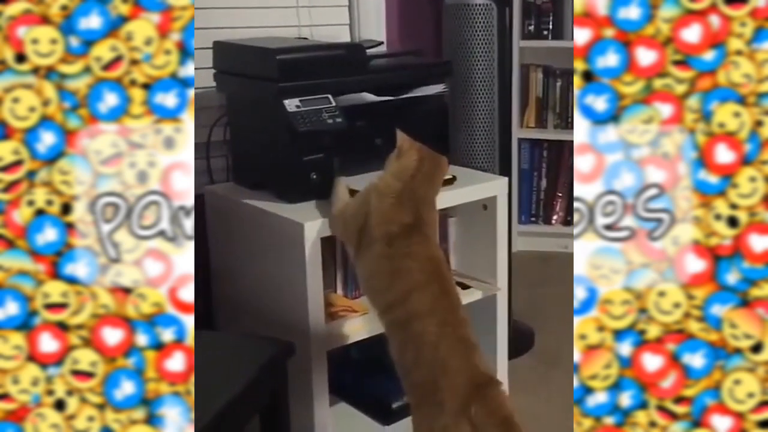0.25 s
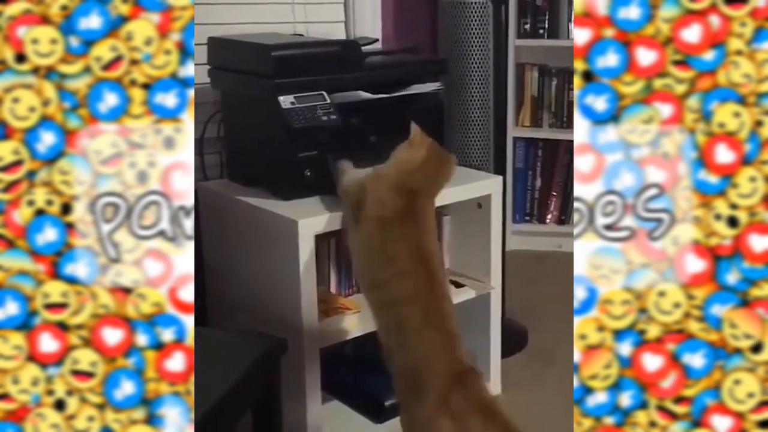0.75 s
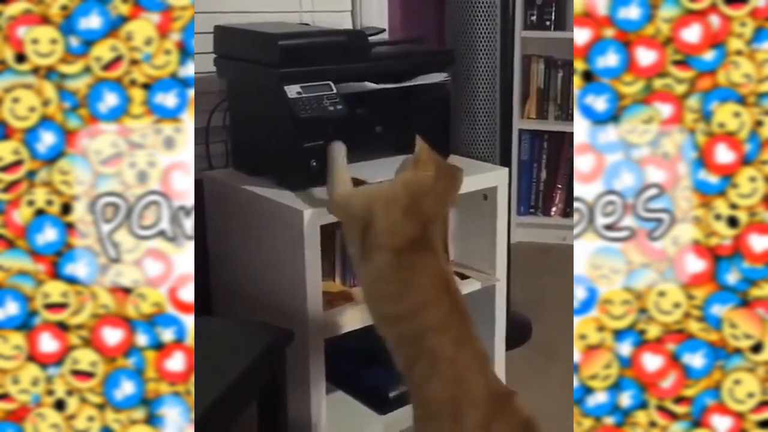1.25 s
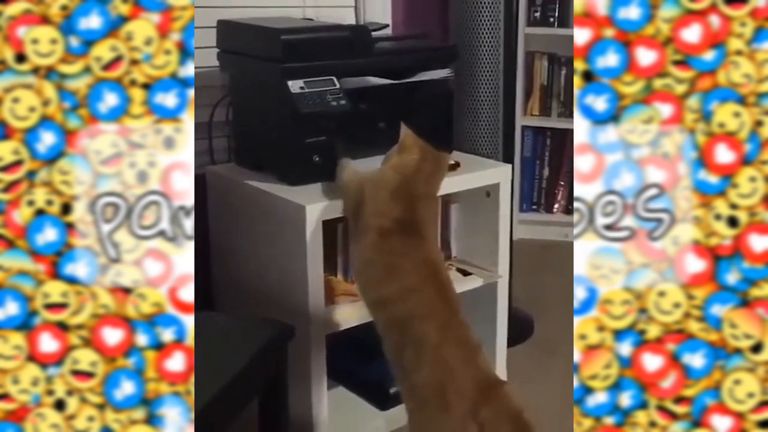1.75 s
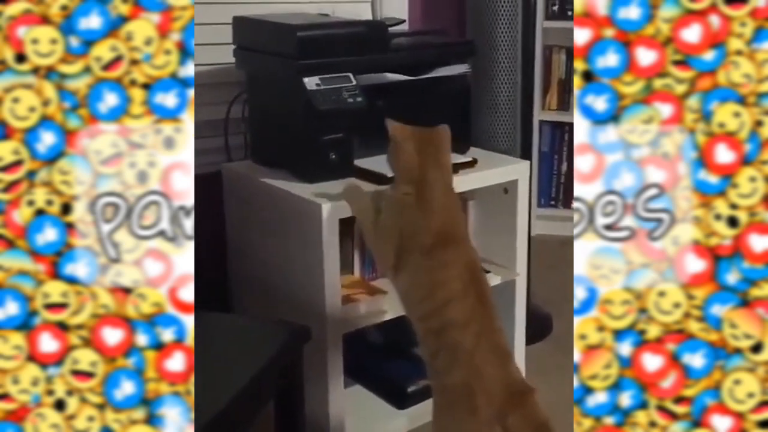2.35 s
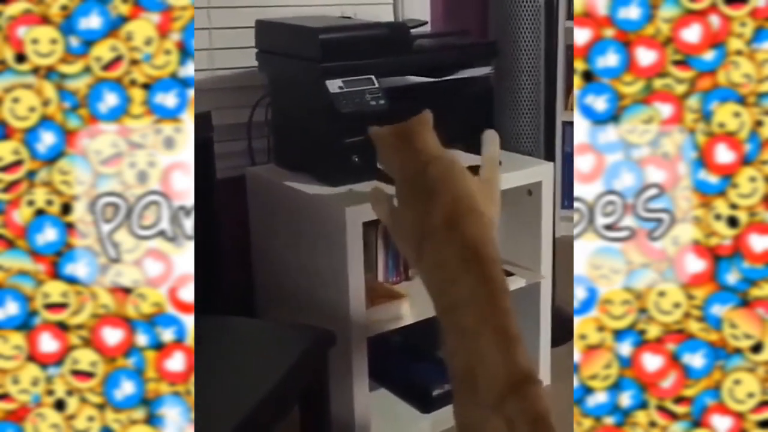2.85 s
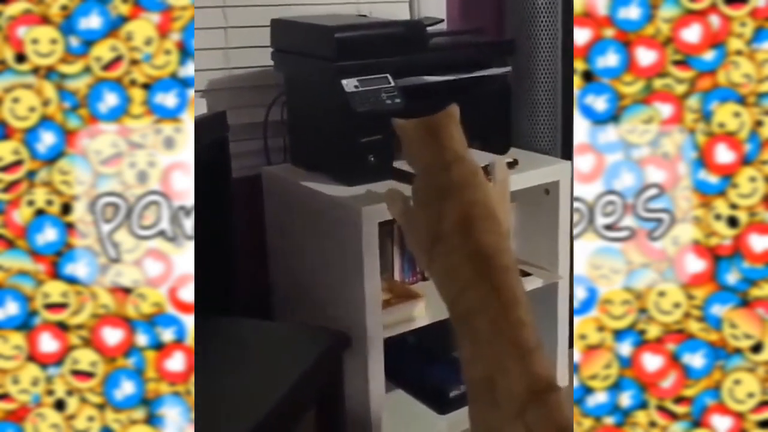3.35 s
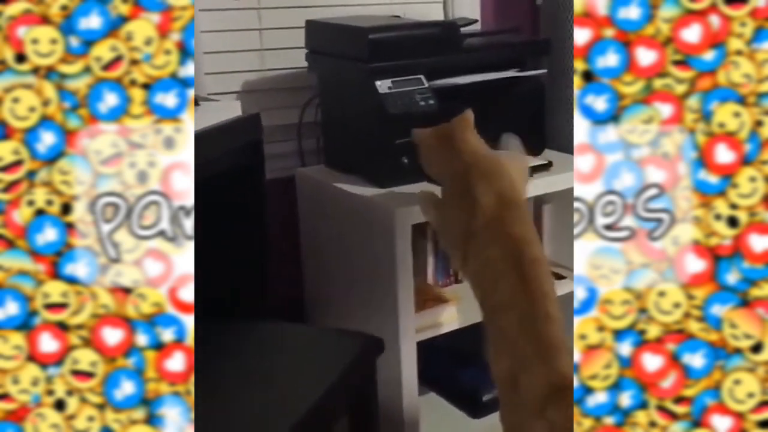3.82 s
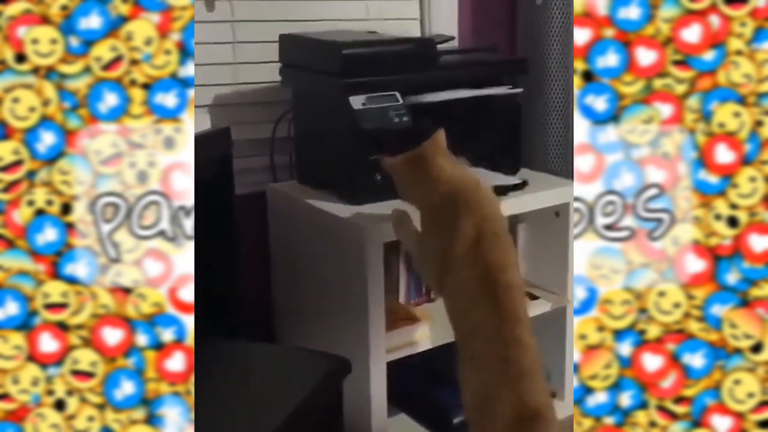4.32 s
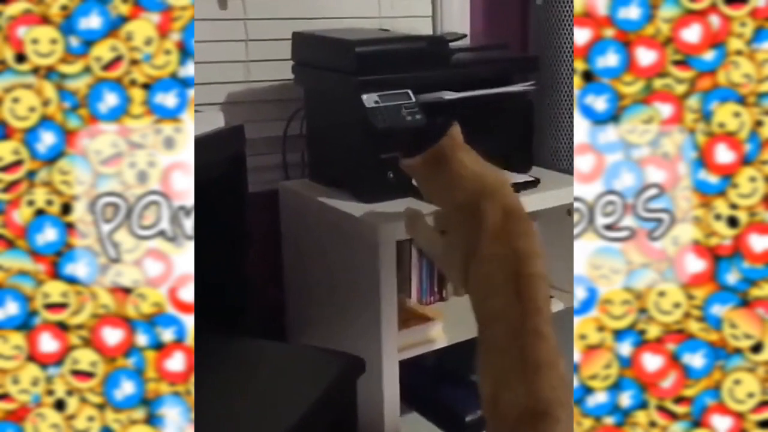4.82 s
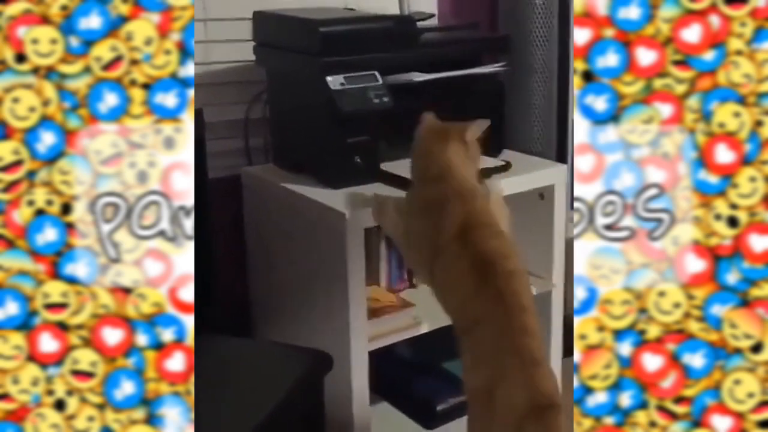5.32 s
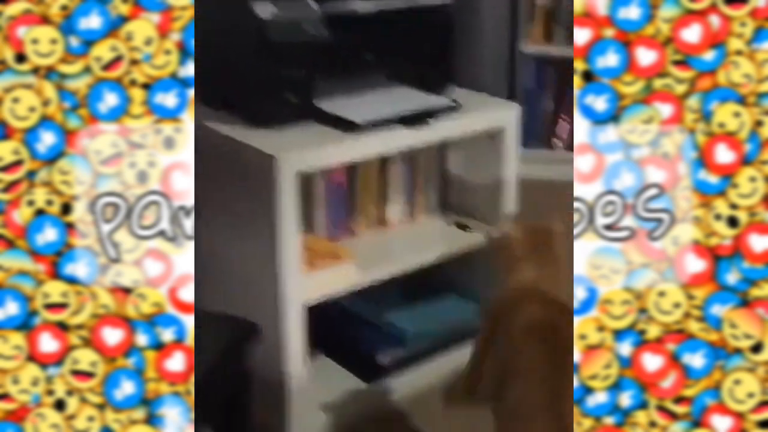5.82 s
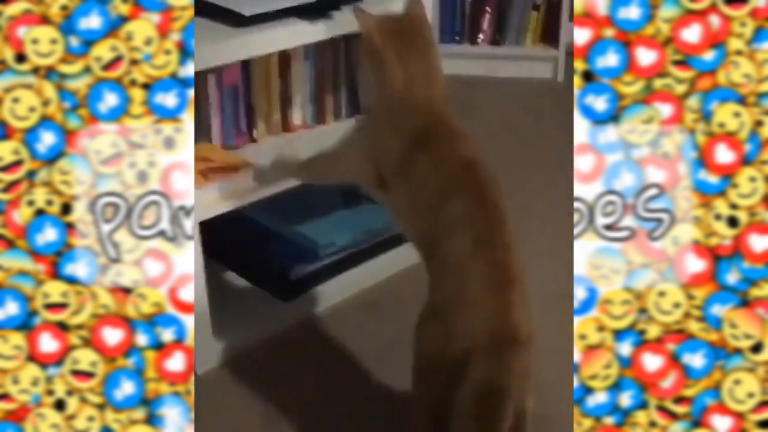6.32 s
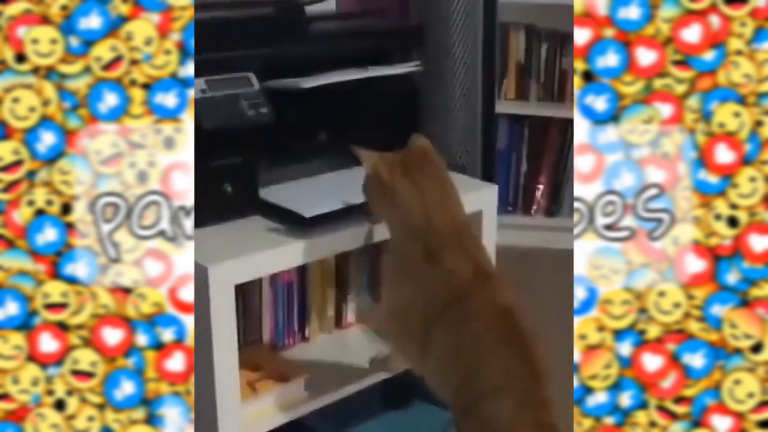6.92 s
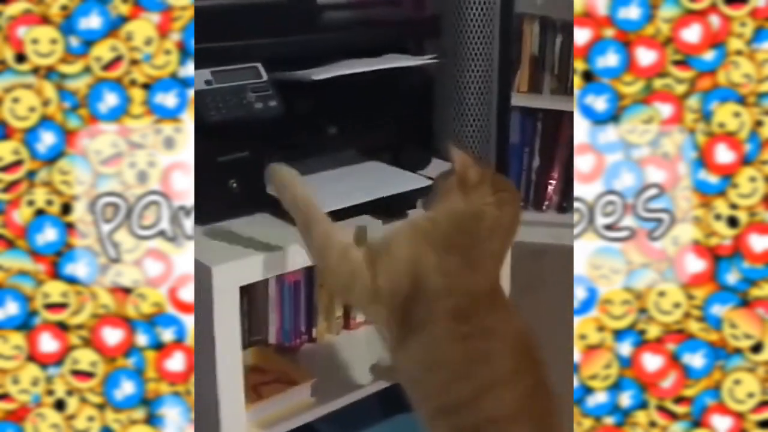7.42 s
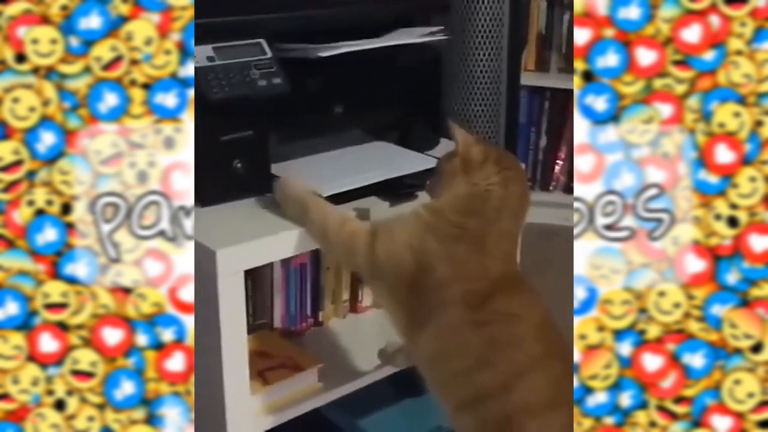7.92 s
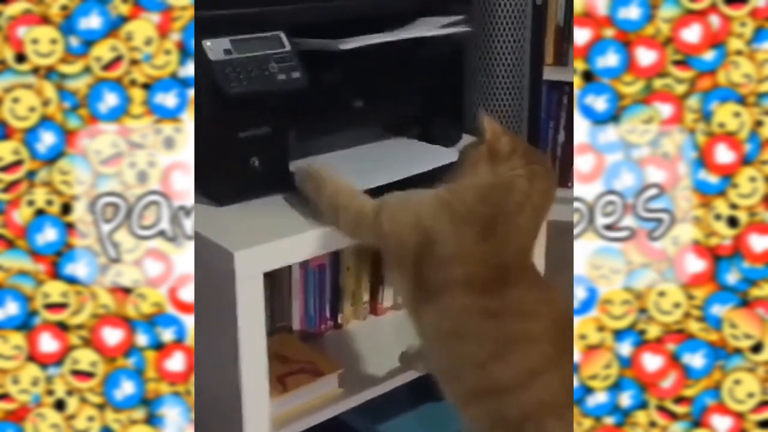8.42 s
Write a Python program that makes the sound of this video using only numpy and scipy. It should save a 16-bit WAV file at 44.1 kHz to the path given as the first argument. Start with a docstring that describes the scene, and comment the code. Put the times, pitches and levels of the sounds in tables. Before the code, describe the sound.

A soft fan hum with a faint whirr runs throughout in a small, quiet room, heard from a few steps away. A cat bats at a printer's loose plastic paper tray, each swat a quick clack and chatter that rings briefly. Two light clacks open, followed by paw scuffs and tiny claw pings, then harder swats with dull shelf thuds from about 0.9 to 1.6 seconds. Only sparse, faint taps come between 2 and 3.7 seconds. Scuffs lead into a second run of five sharp clacks from 4 to 5.1 seconds, the first ones with low thumps. Around 6 seconds the cat drops down and climbs back with faint thuds, then pats and scrapes on paper from 6.5 to 7.3 seconds. Three closer, brighter clacks land between 7.3 and 7.8 seconds, and two more near 8.5 seconds.

```python
"""Small, quiet room: a cat stands against a shelf and bats at an idling printer's plastic paper tray.
Each swat makes the loose tray clack and chatter; between swats the paws scuff and tap on paper and shelf.
Claws ping on the tray and the cat's weight thuds on shelf and floor.
The room rings briefly after every blow, over the soft hum of a fan."""
import sys
import numpy as np
from scipy import signal
from scipy.fft import rfft, irfft
from scipy.io import wavfile
from scipy.ndimage import uniform_filter1d

SR = 44100
rng = np.random.default_rng(int(sys.argv[2]) if len(sys.argv) > 2 else 0)


def store_wav(level_fs):
    """Save 16-bit WAV to argv[1]."""
    pcm = np.round(np.clip(np.atleast_2d(level_fs), -1, 1) * 32767)
    wavfile.write(sys.argv[1], SR, pcm.T.astype(np.int16))


N = 381899
SIZE = 32768  # samples per blow
T = np.arange(SIZE) / SR
HZ = np.fft.rfftfreq(SIZE, 1 / SR)

# spectrum of pad on paper: f/Hz, level/dB
PAD_ON_PAPER = [(25, -26), (70, -20.5), (120, -9.5), (240, 1), (420, -6.5), (650, 15), (1400, 9.5),
                (2400, -2.5), (4000, -10), (7000, -19), (10400, -23.5), (13000, -25.5)]


def undb(db):
    """Decibels to gain."""
    return 10 ** (np.asarray(db) / 20)


def curve(points, hz):
    """Join (f/Hz, level/dB) points on a log-frequency axis."""
    f, db = np.transpose(points)
    return np.interp(np.log(hz + 1), np.log(f), db)


def bumps(count, size):
    """Smooth random ripple, about size steps wide, unit spread."""
    x = uniform_filter1d(uniform_filter1d(rng.standard_normal(count), size), size)
    return x / x.std()


def drift(rate_hz):
    """Slow random walk between values of unit spread."""
    step = int(SR / rate_hz)
    return uniform_filter1d(np.repeat(rng.standard_normal(N // step + 1), step), step)[:N]


def band(x, hz, kind):
    """Steep causal crossover filter."""
    return signal.sosfilt(signal.butter(4, hz, kind, fs=SR, output="sos"), x)


def causal(db):
    """Minimum-phase response with this gain: rings only after the blow."""
    cepstrum = irfft(np.log(undb(db)))
    cepstrum[1:SIZE // 2] *= 2
    cepstrum[SIZE // 2 + 1:] = 0
    return np.exp(rfft(cepstrum))


def contacts(contact_s, rate_hz, firm_s):
    """Spectrum of contact energy: one hard tap if brief, a swelling shower of rebounds if long."""
    contact_s = max(contact_s, 5e-4)
    catches = rng.exponential(size=SIZE) * (rng.random(SIZE) < rate_hz / SR) + .01
    shower = catches * T * np.exp(-3 * T / contact_s)
    energy = shower / shower.sum()
    energy[0] += (firm_s / contact_s) ** 2
    return rfft(energy)


def ring(strikes, tick_db, crack_db, crack_s, build_s, t60_s, tick_s=0.00081):
    """Each contact ticks and sets off a dense crack in the part; uneven wall echoes build and die."""
    tick, crack = np.exp(-2 * T / tick_s), np.exp(-2 * T / crack_s)
    decay = undb(-60 * T / t60_s + 1.3 * bumps(SIZE, size=60))
    echoes = ((1 - np.exp(-T / build_s)) * decay) ** 2
    direct = undb(tick_db) ** 2 * tick / tick.sum() + undb(crack_db) ** 2 * crack / crack.sum()
    energy = irfft(strikes * rfft(direct + echoes / echoes.sum()))
    return np.sqrt(np.abs(energy)) * rng.standard_normal(SIZE)


def blow(strikes):
    """Spectrum of one blow in the room: the bass builds late, the treble is more direct."""
    bass = ring(strikes, tick_db=-18, crack_db=-4.0, crack_s=0.0043, build_s=0.01, t60_s=0.27)
    middle = ring(strikes, tick_db=-5.5, crack_db=-2.5, crack_s=0.011, build_s=0.0054, t60_s=0.34)
    treble = ring(strikes, tick_db=-9.5, crack_db=-1.8, crack_s=0.006, build_s=0.0064, t60_s=0.3)
    return rfft(band(bass, 480, "low") + band(middle, [480, 3800], "band") + band(treble, 3800, "high"))


def blows(rows, colour_db, rate_hz, firm_s, spot_db):
    """Strike a body once per row: t/s, mid level/dB, thump, bite, snap/dB re mid, contact/s."""
    # thump, mid, bite and snap bands: low/Hz, high/Hz
    bands = [(120, 450), (550, 1400), (1400, 3500), (4500, 14000)]
    out, body = np.zeros(N + SIZE), causal(colour_db)
    for s, db, thump_db, bite_db, snap_db, contact_s in rows:
        spot = causal(spot_db * bumps(len(HZ), size=90))  # each spot favours other modes
        spectrum = blow(contacts(contact_s, rate_hz, firm_s)) * body * spot
        band_rms = np.array([np.linalg.norm(spectrum[(HZ > lo) & (HZ < hi)]) for lo, hi in bands])
        band_rms /= np.sqrt(SIZE / 2 * SR / 20)  # as if the blow lasted 50 ms
        low, mid, upper, high = db + np.array([thump_db, 0, bite_db, snap_db]) - 20 * np.log10(band_rms)
        touch = [(400, low), (650, mid), (1150, mid), (1700, upper), (3000, upper), (5200, high)]
        fade = np.minimum(2 - 2 * T / T[-1], 1)
        start = max(int(s * SR), 0)
        out[start:start + SIZE] += irfft(spectrum * causal(curve(touch, HZ))) * fade
    return out[:N]


def peaks_and_notches_db():
    """Resonant peaks and a few narrow treble notches that colour each blow."""
    # peaks (+) and notches (-): f/Hz, width/Hz, gain/dB
    peaks_and_notches = [(130.5, 11.4, 0), (162.8, 19, 2), (211.8, 21, 8.5), (249, 6.7, 4),
                         (310.8, 11, 4.5), (353.7, 35, 4.5), (372.5, 71, 6.5), (422, 6.3, 3),
                         (890, 52, 3.5), (943, 14, 6), (1015, 37, 5.5), (1243, 27, 5), (1385, 60, 9),
                         (1603, 22, 5.5), (1613, 8.1, 4), (1926, 44, 4), (1977, 78, 3.5), (2156, 23, 6),
                         (2570, 11, 4.5), (2800, 20, 8), (2990, 27, 3.5), (3330, 28, 5.5), (3840, 67, 3.5),
                         (4250, 33, 2), (4700, 32, -2), (4930, 15, -9), (5840, 85, 3.5), (7280, 89, -2.5),
                         (8160, 65, -23), (8800, 41, 7)]
    return sum(db / (1 + (2 * (HZ - hz) / width) ** 2) for hz, width, db in peaks_and_notches)


def swat_rows(firm_db=-34.5, nearer_s=6.4, paw_contact_s=0.0062, rebound_s=.056):
    """The paw lands, then the tray hits its stop: brighter and leaner if harder. The hardest rebounds."""
    # t/s, paw level/dB, claw snap/dB, clack delay/s, clack level/dB, chatter/s
    swats = [(0.0, -40, -8.5, 0.0037, -38, 0.018), (0.227, -49.5, -8, 0.0051, -44.5, 0.0052),
             (0.853, -35, -8.5, .016, -36.5, 0.0082), (1.132, -38.5, 1, .026, -31, 0.016),
             (1.358, -34.5, -9.5, 0.03, -32.5, 0.012), (1.585, -40.5, -16, 0.0098, -39.5, 0.01),
             (1.928, -45.5, -13.5, 0.029, -47, 0.018), (2.968, -52, 0, .003, -45.5, 0.0064),
             (3.435, -54, -9, .003, -57, 0.0057), (4.085, -45, -11, .012, -31, 0.0035),
             (4.28, -32.5, -6.5, .001, -31.5, 0.0042), (4.504, -39, -15, 0.0094, -31, 0.023),
             (4.773, -47.5, -10, 0.011, -34, 0.009), (5.073, -35.5, -15.5, 0.0049, -32, 0.005),
             (7.337, -36, -12, .0105, -29.5, 0.0023), (7.512, -35, -4, .015, -33, 0.018),
             (7.735, -38, -5.5, 0.012, -34, 0.0053), (8.419, -37.5, -6, 0.0038, -39.5, 0.0068),
             (8.62, -35, -7.5, 0.018, -38, 0.0046)]
    rows = []
    for s, paw_db, claw_db, delay_s, clack_db, chatter_s in swats:
        near = s > nearer_s  # the listener steps up: clacks gain weight and edge
        force_db = clack_db - firm_db
        thump_db = -4 - 0.23 * force_db + 4.5 * near
        bite_db = 1.66 + 3 * near
        snap_db = -7 + 0.22 * force_db + 7 * near
        rows.append((s, paw_db, -6, -2, claw_db, paw_contact_s))
        rows.append((s + delay_s, clack_db, thump_db, bite_db, snap_db, chatter_s))
    s, _, _, delay_s, clack_db, _ = max(swats, key=lambda swat: swat[4])
    rebound = (s + delay_s + rebound_s, clack_db - 7, -4, 0, -8, 0.015)
    return rows + [rebound]


def tray():
    """The loose plastic tray clacks and chatters; many weak modes lie between its main ones."""
    # spectrum of struck plastic: f/Hz, level/dB
    plastic = [(25, -30), (62, -11), (90, -13.5), (150, -8.5), (320, 0), (480, -6), (720, -3), (1300, 0.5),
               (2100, 1.5), (3500, -6.5), (6000, -10.5), (9000, -14.5), (10400, -18.5), (13000, -16)]
    weak_modes_db = 1.6 * bumps(len(HZ), size=50) * np.clip(HZ / 4000, 0, 1)
    colour_db = curve(plastic, HZ) + peaks_and_notches_db() + weak_modes_db
    return undb(-1.92) * blows(swat_rows(), colour_db, rate_hz=1100, firm_s=0.0045, spot_db=1.5)


def fan():
    """Soft rushing air with a restless narrow-band whirr and a finer hiss above."""
    # spectrum of fan and room air: f/Hz, density/dB
    rush = [(25, -19), (62, -10), (100, -7), (125, -2), (170, -6.5), (240, 2), (400, -7), (630, -7),
            (950, -6.5), (1500, -4), (2500, -11.5), (5000, -19), (8000, -27), (13000, -28)]
    # fan as the listener moves about: t/s, level/dB, hiss/dB
    levels = [(0, -60, -4), (1.8, -56.5, -6), (3.5, -58.5, -4.5), (6.0, -57, -2.5), (6.45, -56.5, 4),
              (6.75, -57.5, -6), (8.601, -55.5, 0)]
    # whirr peaks and one dip: f/Hz, width/Hz, gain/dB
    whirr = [(126, 16, 3.5), (208.4, 13, 14), (259.4, 6.1, 5.5), (305.8, 7, 12), (571, 7.4, 11.5),
             (615, 11, 3), (767, 9.5, 19), (1180, 23, 4.5), (1390, 48, -4), (1530, 14, 8), (1740, 20, 13.5),
             (2380, 32, 5), (3050, 34, 8.5), (3500, 23, 13)]
    s, level_db, hiss_db = np.transpose(levels)
    t, f = np.arange(N) / SR, np.fft.rfftfreq(N, 1 / SR)
    whirr_db = sum(db / (1 + (2 * (f - hz) / width) ** 2) for hz, width, db in whirr)
    standing_waves_db = 2.0 * bumps(len(f), size=250)
    air = irfft(rfft(rng.standard_normal(N)) * undb(curve(rush, f) + whirr_db + standing_waves_db), N)
    air /= air.std()
    hiss = signal.sosfiltfilt(signal.butter(2, 3500, "high", fs=SR, output="sos"), air)
    air += hiss * (undb(np.interp(t, s, hiss_db) + .5 * drift(rate_hz=10)) - 1)
    return air * undb(np.interp(t, s, level_db) + .5 * drift(rate_hz=14))


def shuffles(count=26, level_db=-69.0, spread_db=9.5, bite_db=1, snap_db=-13):
    """The cat shifts its feet: faint brushes at random moments."""
    rows = []
    for k, (when, force, length) in enumerate(rng.random((count, 3))):
        s = (k + when) * N / SR / count
        db = level_db + spread_db * (2 * force - 1)
        rows.append((s, db, 0, bite_db, snap_db, 0.0038 + 0.02 * length))
    return blows(rows, curve(PAD_ON_PAPER, HZ), rate_hz=150, firm_s=0.0028, spot_db=2.5)


def paws(thump_db=-4.5, bite_db=2, graze_lead_s=.015):
    """Pads tap and scrape over paper and shelf in tiny catches; claws graze just before each pat."""
    # scuffs and taps: t/s, level/dB, snap/dB, contact/s
    scuffs = [(0.387, -62, -39, 0.0095), (0.676, -48.5, -22, 0.025), (0.755, -52.5, -8, 0.0082),
              (0.838, -47.5, -12, 0.038), (0.933, -54, -2, 0.034), (1.002, -50.5, 4, .002),
              (1.021, -50, -9, 0.061), (1.629, -59, 9, .002), (2.269, -60.5, -15, 0.012),
              (3.606, -64, -15, 0.0078), (3.836, -54, -28, 0.0083), (3.898, -48.5, -12.5, 0.037),
              (3.977, -53, -9, 0.0036), (6.57, -52, -7.5, .005), (6.622, -53.5, -23, 0.0044),
              (6.788, -57, -21, 0.0043), (6.985, -51.5, -29, 0.012), (7.115, -52, -4, .006),
              (7.147, -51, -9, .003), (7.284, -55.5, -15, .0035), (7.959, -61, -2, .02)]
    # pats on the paper: t/s, level/dB, snap/dB, contact/s
    pats = [(0.549, -45.5, -22, 0.014), (3.768, -46, -17, 0.0052), (6.938, -45.5, -17, 0.0065),
            (7.069, -46.5, -8.5, 0.0096)]
    grazes = [(s - graze_lead_s, db - 7, -6.5, 0.012) for s, db, _, _ in pats]
    rows = [(s, db, thump_db, bite_db, snap_db, contact_s)
            for s, db, snap_db, contact_s in scuffs + pats + grazes]
    colour_db = curve(PAD_ON_PAPER, HZ) + 0.62 * peaks_and_notches_db()
    return undb(-0.5) * blows(rows, colour_db, rate_hz=550, firm_s=0.0062, spot_db=3.5)


def claw_pings(t60_s=0.3, spike_s=0.0082, spike_db=6):
    """A claw slips off the tray: a spike in a few high resonances, then a short shimmer."""
    # claw slips: t/s, level/dB
    slips = [(0.757, -51.5), (1.003, -55), (3.978, -49), (7.146, -48.5)]
    # high resonances: f/Hz, width/Hz, level/dB
    modes = [(8580, 210, 0), (9400, 150, -4), (12450, 1300, -8)]
    out = np.zeros(N + SIZE)
    colour = sum(undb(db) / (1 + (2 * (HZ - hz) / width) ** 2) for hz, width, db in modes)
    fade = undb(spike_db) * np.exp(-T / spike_s) + undb(-60 * T / t60_s)
    for s, db in slips:
        shimmer = irfft(rfft(rng.standard_normal(SIZE)) * colour)
        start = int(s * SR)
        out[start:start + SIZE] += undb(db) * shimmer / shimmer.std() * fade / fade[0]
    return out[:N]


def thuds(push_s=0.0037, t60_s=0.21):
    """Shelf and floor boom dully under harder swats and as the cat drops down and climbs back."""
    # booms of shelf and floor, under swats or the cat's weight: t/s, level/dB, f/Hz
    impacts = [(0.87, -38, 153), (1.160, -33, 177), (1.165, -43, 62), (3.902, -40, 180),
               (4.100, -33.5, 190), (4.284, -31.5, 203), (5.925, -53, 197), (6.063, -48, 285),
               (6.609, -48, 238)]
    out = np.zeros(N + SIZE)
    attack = 1 - np.exp(-T / push_s)
    for s, db, hz in impacts:
        boom = band(rng.standard_normal(SIZE), [hz * .75, hz * 1.25], "band")
        start = int(s * SR)
        out[start:start + SIZE] += boom / boom.std() * attack * undb(db - 60 * T / t60_s)
    return out[:N]


def scene():
    """Tray, cat and fan from a few steps away, mono."""
    return (tray() + paws() + shuffles() + claw_pings() + thuds() + fan())[None]


def record(dry):
    """Steep low-pass on the top treble."""
    cut_hz = 14100
    return signal.sosfilt(signal.ellip(10, .2, 70, cut_hz, fs=SR, output="sos"), dry)


dry = scene()
out = record(dry)
store_wav(out)
```